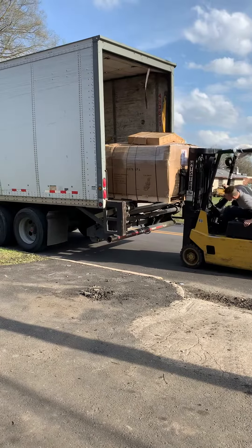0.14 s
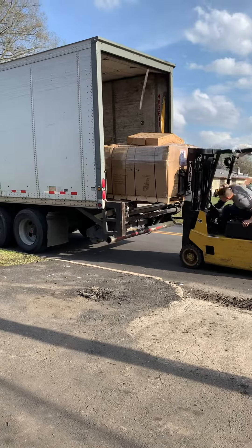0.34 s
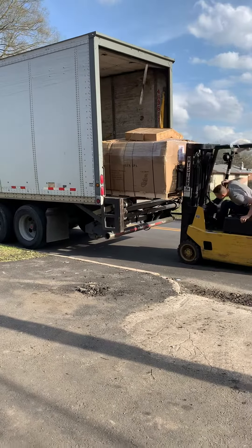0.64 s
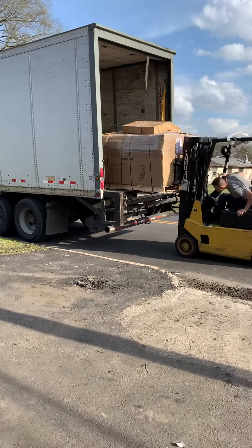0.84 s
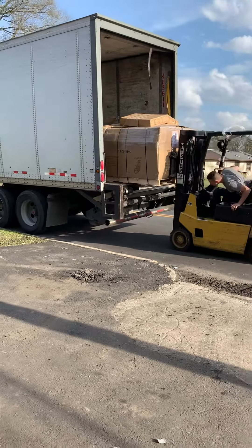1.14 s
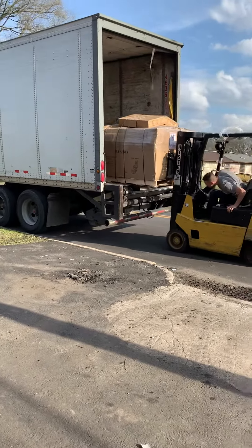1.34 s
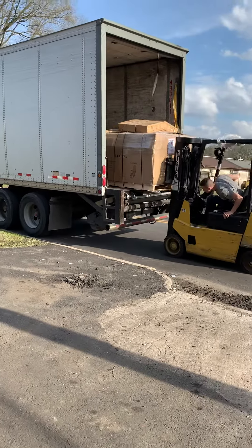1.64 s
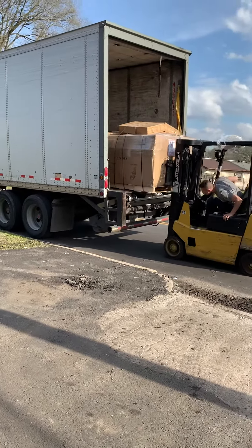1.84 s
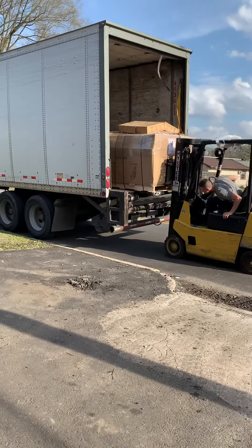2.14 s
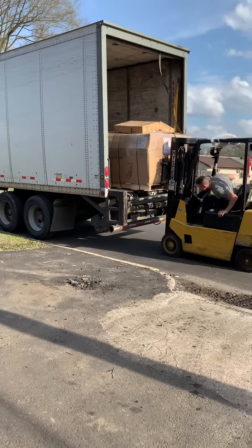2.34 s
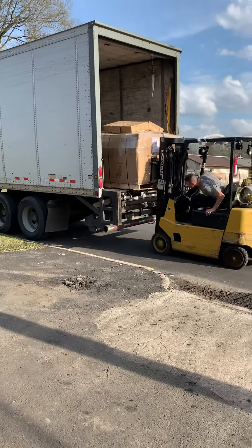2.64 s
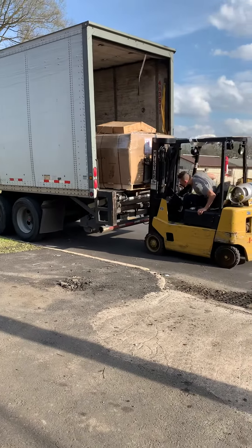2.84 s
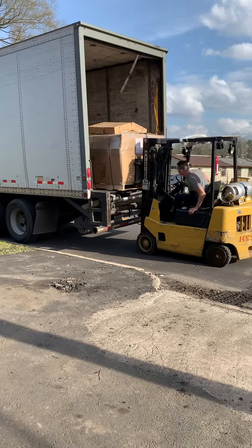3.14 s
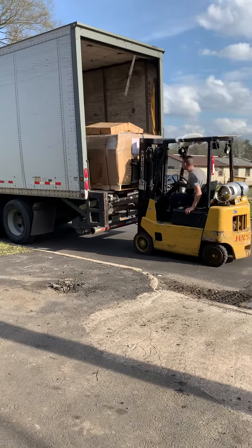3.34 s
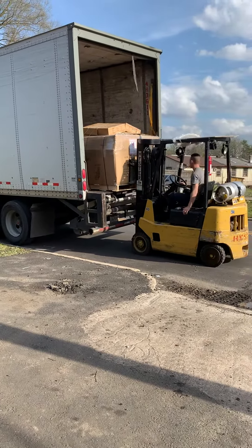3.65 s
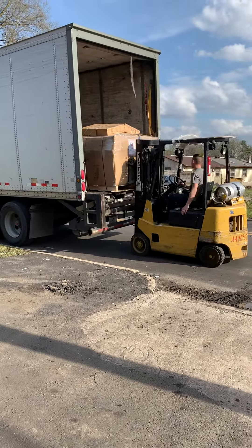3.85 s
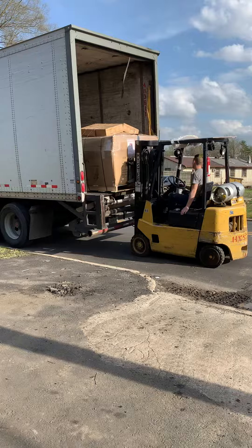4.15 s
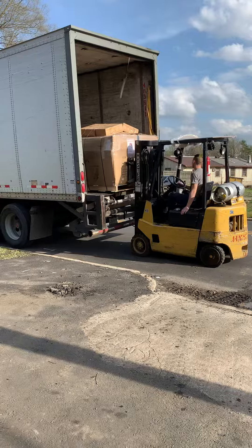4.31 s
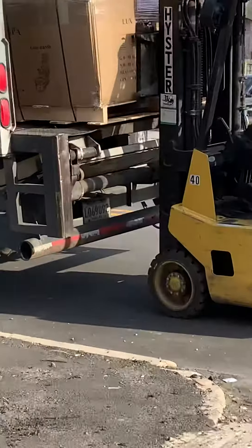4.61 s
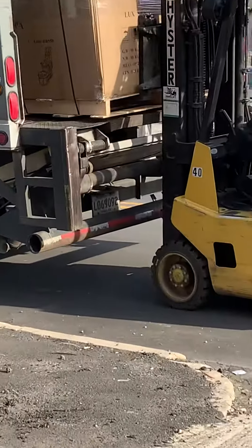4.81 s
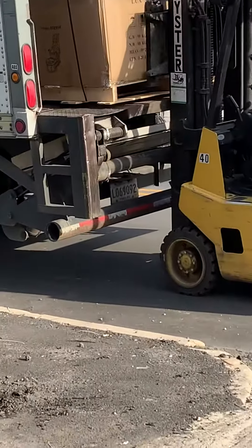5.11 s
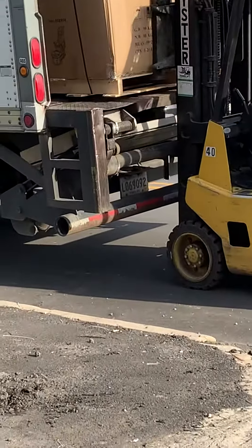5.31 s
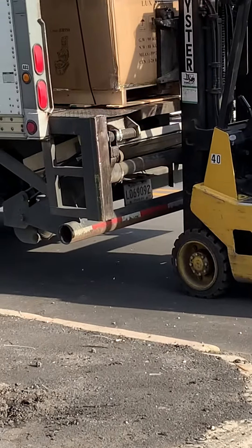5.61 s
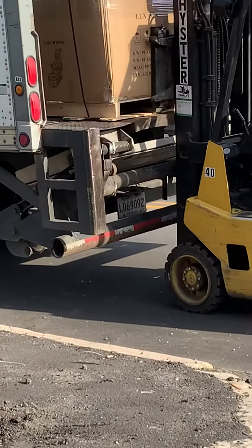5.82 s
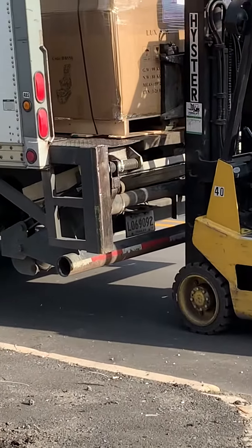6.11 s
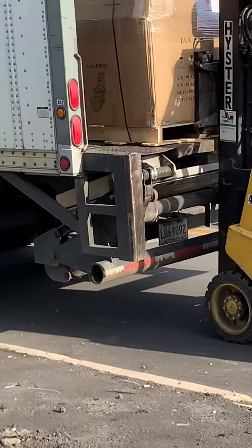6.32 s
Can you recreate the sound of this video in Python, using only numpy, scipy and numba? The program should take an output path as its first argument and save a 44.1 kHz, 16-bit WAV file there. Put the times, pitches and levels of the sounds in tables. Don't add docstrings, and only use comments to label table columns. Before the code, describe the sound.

Low uneven engine throb with hissing, rattling hood, wind buffeting the microphone, small metallic pings, then forks clanking sharply on a steel trailer.

```python
import sys
import numpy as np
from scipy import signal
from scipy.fft import rfft, irfft, next_fast_len
from scipy.io import wavfile
from scipy.ndimage import uniform_filter1d
from numba import njit

SR = 44100
rng = np.random.default_rng(int(sys.argv[2]) if len(sys.argv) > 2 else 0)


def attenuation_scalar(level_db):
    decades = np.asarray(level_db, float) / 20
    return 10 ** decades


def int16_out(signal):
    q = np.round(np.clip(np.atleast_2d(signal).T, -1, 1) * 32767)
    wavfile.write(sys.argv[1], SR, q.astype(np.int16))


N = 285323


def curve(rows):
    s, *columns = np.transpose(rows)
    return [np.interp(np.arange(N) / SR, s, c) for c in columns]


def unit(x):
    return x / np.sqrt(np.mean(x ** 2))


def on_log(points, hz):
    at, value = np.transpose(points)
    return np.interp(np.log(np.maximum(hz, 1)), np.log(at), value)


@njit
def svf(x, hz, width):
    y, band, low = np.empty(len(x)), 0., 0.
    g, k = np.tan(np.pi * hz / SR), width / hz
    for i in range(len(x)):
        v = (band + g * (x[i] - low)) / (1 + g * (g + k))
        band, low, y[i] = 2 * v - band, low + 2 * g * v, k * v
    return y


def walk(rate):
    k = int(SR / rate)
    held = np.repeat(rng.standard_normal(1000), k)[:N]
    return 1.125 * uniform_filter1d(uniform_filter1d(held, k), k)


def swells(base_db, s, length, db):
    t = np.arange(N) / SR
    power = attenuation_scalar(2 * base_db)
    power = power + sum(attenuation_scalar(2 * d) * np.exp(-(2 * (t - at) / w) ** 2) for at, w, d in zip(s, length, db))
    return 10 * np.log10(power)


def rush(points, flicker_db, rate):
    size = next_fast_len(N)
    hz, out, shared = np.fft.rfftfreq(size, 1 / SR), 0, walk(rate)
    inside = (hz > points[0][0]) * (hz < points[-1][0])
    shaped = rfft(rng.standard_normal(N), size) * attenuation_scalar(on_log(points, hz)) * inside
    third = 3 * np.log2(np.maximum(hz, 1))
    lowest, highest = 3 * np.log2(points[0][0]), 3 * np.log2(points[-1][0])
    for centre in np.arange(np.floor(lowest), highest + 2, 2):
        band = np.clip(1 - abs(third - centre) / 2, 0, 1)
        flicker = flicker_db * (shared + walk(rate)) / np.sqrt(2)
        out = out + irfft(shaped * band, size)[:N] * attenuation_scalar(flicker)
    return unit(out)


def burst(hz, width, t60, rise):
    t = np.arange(int(.25 * SR)) / SR
    noise = rng.standard_normal(len(t))
    for _ in range(3):
        noise = svf(noise, 1. * hz, 1. * width)
    y = noise * (1 - np.exp(-t / rise)) * np.exp(-np.log(1000) * t / t60)
    return y / abs(y).max()


def add(track, s, sound):
    i = int(s * SR)
    track[..., i:i + sound.shape[-1]] += sound[..., :N - i]


def engine():
    # start_s, firing_hz, exhaust_db
    running = [(0.0, 37.69, -31.5), (0.65, 35.0, -38.5), (1.08, 30.29, -34), (1.27, 29.98, -38.5),
               (1.38, 31.19, -39.5), (1.71, 33.31, -29), (2.0, 34.63, -28.5), (2.22, 32.6, -30.5),
               (2.65, 29.34, -33.5), (3.1, 32.8, -31), (3.41, 34.32, -33.5), (3.8, 35.52, -28.5),
               (4.4, 34.26, -34), (4.99, 31.61, -33.5), (5.06, 30.64, -36.5), (5.3, 32.83, -30),
               (5.77, 35.2, -31), (6.47, 37.24, -33.5)]
    # pitch_hz, width_hz, level_db
    pipe_tones = [(35, 16, -0.5), (69.5, 64, 2), (260, 80, -15.5), (341, 44, -20.5), (430, 26, -15.5),
                  (784, 200, -17.5)]
    # pitch_hz, over_exhaust_db
    yard_boom = [(104, 2.5), (118, 13.5), (141, 0.5), (162, 6), (178, -7.5), (216, -4.5), (250, -12.5),
                 (290, -16), (338, -22.5), (355, -13), (378, -20.5)]
    # start_s, gain_per_order_db
    exhaust_facing = [(0, 6.5), (.45, 7.5), (.8, 3), (1.1, 5), (1.5, 4), (2.0, -.5), (2.4, 4.5), (2.8, 3),
                      (3.3, 4), (3.9, 1), (4.4, 4), (5.0, -2.5), (5.6, 2.5), (5.9, -1), (6.2, 1.5),
                      (6.47, -1.5)]
    orders = (3, 4, 5, 10, 6, 7, 8)
    hz, db = curve(running)
    facing, = curve(exhaust_facing)

    t = np.arange(N) / SR
    turned = np.clip(np.minimum(t - 4, 6.1 - t) / 0.14, 0, 1)

    turns = np.cumsum(hz * (1 + 0.0021 * walk(12))) / SR
    fired = np.flatnonzero(np.diff(np.floor(turns)))
    firing_db = 3.1 * np.clip(rng.standard_normal(400)[:len(fired)], -2, 1)
    pulses = np.zeros(N)
    pulses[fired] = attenuation_scalar(firing_db)

    pipe = 0
    for k, (tone_hz, width_hz, tone_db) in enumerate(pipe_tones):
        ring = pulses
        for _ in range(2):
            ring = svf(ring, 1. * tone_hz, 1.74 * width_hz)
        shadow_db = -3 * turned * (k > 1)
        pipe = pipe + (-1) ** k * attenuation_scalar(tone_db + shadow_db) * unit(ring)

    boom = 0
    for order in orders:
        order_db = db + on_log(yard_boom, order * hz) + facing * (min(order, 6) - 4.6)
        if order >= 6:
            order_db = order_db - 27 * turned
        if order >= 7:
            order_db = order_db - 5.5
        level = attenuation_scalar(order_db + 2.97 * walk(14))
        boom = boom + level * np.cos(2 * np.pi * order * turns + 0.13 * order * walk(12))
    boom = boom * attenuation_scalar(1.25 * np.interp(np.arange(N), fired, firing_db))
    return unit(pipe) * attenuation_scalar(db) + boom, turns


def pump(turns):
    # start_s, length_s, level_db
    lifts = [(1.033, 0.031, -41), (1.242, 0.032, -44), (1.39, 0.045, -46), (1.443, 0.082, -40.5),
             (1.53, 0.049, -45), (1.594, .14, -40), (2.86, 0.12, -44.5), (2.983, 0.18, -37.5),
             (3.165, 0.26, -43), (3.5, 1.16, -51), (1.74, .17, -54), (5.055, 0.11, -44),
             (5.156, 0.18, -38.5), (5.36, 0.153, -38.5), (5.524, 0.24, -40), (5.897, 0.44, -45)]
    teeth, edge_s, idle_db = 25, 0.026, -59
    t = np.arange(N) / SR
    load = attenuation_scalar(idle_db)
    for s, length, db in lifts:
        load = load + attenuation_scalar(db) * np.clip(np.minimum(t - s, s + length - t) / edge_s + .5, 0, 1)
    level = load * attenuation_scalar(2.5 + 2.4 * walk(45))
    return level * np.sin(2 * np.pi * teeth * turns + 0.7 * walk(40) + 0.6 * walk(15))


def rattle(points, per_second, spread_db, count):
    out = 0
    pitches = np.geomspace(1.2 * points[0][0], .95 * points[-1][0], count)
    for hz in pitches * attenuation_scalar(0.26 * rng.standard_normal(count)):
        at, taps = rng.integers(0, N, int(per_second * N / SR)), np.full(N, 1e-18)
        size_db = spread_db * np.minimum(rng.exponential(size=len(at)), 3)
        taps[at] = attenuation_scalar(size_db) * rng.standard_normal(len(at))
        ring = svf(svf(taps, hz, hz / 8), hz, hz / 45)
        out = out + unit(ring) * attenuation_scalar(on_log(points, hz)) * np.sqrt(hz)
    return unit(out)


def hood(turns):
    # start_s, clatter_db
    steady = [(0.0, -40.5), (.4, -42.5), (.9, -43.5), (1.0, -44.5), (1.7, -43.5), (2.06, -42), (2.5, -45),
              (2.95, -46), (3.26, -41.5), (4.1, -40), (4.2, -44), (4.29, -41), (4.7, -41), (5.16, -43),
              (5.5, -39.5), (5.7, -41.5), (6.0, -38.5), (6.47, -41)]
    # centre_s, length_s, clatter_db, hiss_db
    jolts = [(0.52, 0.1, -40.5, -50), (0.646, 0.059, -38, -45), (1.368, 0.12, -45, -69),
             (1.804, 0.037, -38.5, -57), (1.884, 0.12, -47, -43), (2.16, 0.08, -42, -52),
             (2.33, 0.11, -44.5, -49.5), (2.74, 0.043, -63, -52), (2.878, 0.11, -45, -51),
             (4.651, 0.041, -39, -50), (5.272, 0.041, -26, -40.5), (5.624, 0.067, -46, -47),
             (6.242, .06, -54, -64)]
    # pitch_hz, density_db_per_hz
    hiss_colour = [(2200, -15), (3200, -3), (4500, -2.5), (6300, 0), (8500, -2.5), (10500, -1.5),
                   (13000, -12.5), (15500, -10)]
    # pitch_hz, density_db_per_hz
    clatter_colour = [(200, -31), (300, 2), (500, 4.5), (650, -2), (850, 2), (1120, -2), (1600, -2),
                      (1900, -8), (2600, -6.5), (3600, -18.5)]
    # pitch_hz, width_hz, over_hiss_db
    whistles = [(5170, 11.7, 6), (5430, 12, -6), (14995, 45, 8)]
    usual_db = -40.5
    steady_db, = curve(steady)
    s, length, jolt_clatter_db, jolt_hiss_db = np.transpose(jolts)
    clatter_db = swells(steady_db, s, length, jolt_clatter_db)
    steady_hiss_db = usual_db - 5.5 + 1.35 * (steady_db - usual_db)
    hiss_db = swells(steady_hiss_db, s, length, jolt_hiss_db)

    puff = np.exp(-(turns % 1) / 0.56)
    hiss = rush(hiss_colour, flicker_db=2.5, rate=12) * unit(1 + puff)
    hiss = hiss + attenuation_scalar(-2.5) * rattle(hiss_colour, per_second=50, spread_db=0.5, count=34)
    hiss = hiss + sum(attenuation_scalar(db) * svf(hiss, 1. * hz, 1. * width) for hz, width, db in whistles)
    clatter = rush(clatter_colour, flicker_db=1.5, rate=9) * unit(1 + 0.2 * puff)
    clatter = clatter + attenuation_scalar(-6.5) * rattle(clatter_colour[2:], per_second=35, spread_db=-0.7, count=24)
    return hiss * attenuation_scalar(hiss_db + 1.0) + clatter * attenuation_scalar(clatter_db + 2.5)


def clanks():
    # start_s, peak_db, brightest_hz, thud_db, edge_db
    knocks = [(5.242, -21, 1280, -11.5, -42), (5.2513, -15.5, 2800, -10, -34),
              (5.2754, -12.5, 2200, -11, -40), (5.299, -12.5, 3000, -14, -24.5),
              (5.305, -22, 1150, -5, -40), (5.331, -18.5, 1880, -16, -42), (5.3737, -22, 1750, -13.5, -54),
              (5.4084, -26, 1160, -29, -41), (5.4396, -26, 1360, -26, -54), (5.844, -20, 1000, -16, -34),
              (5.864, -19, 1600, -17, -31), (5.878, -19, 2200, -24, -27), (5.885, -23, 1090, -13, -37),
              (5.897, -24, 1300, -27, -37), (5.908, -22, 1110, -29, -44), (5.923, -21, 1100, -24, -47),
              (5.949, -26, 1150, -27, -41)]
    # pitch_hz, level_db, t60_s
    steel = [(464, 4, 0.12), (556, 4, 0.2), (608, 7, 0.29), (920, 5, 0.08), (1133, 9.5, 0.093),
             (1357, -1, 0.063), (1534, 7, 0.23), (1756, 0, 0.2), (2135, 4, 0.2), (2291, 0, 0.19),
             (2600, -5, 0.12), (2820, -1, 0.14), (3020, 1, 0.24), (3400, -18, 0.14)]
    out = np.zeros(N)
    for s, db, hz, thud_db, edge_db in knocks:
        shove = burst(hz, 1.9 * hz, 0.15, 0.00099)
        mix_db = 2. * rng.standard_normal(len(steel))
        ring = sum(attenuation_scalar(d + m) * svf(shove, 1. * f, 6.2 / t60) for (f, d, t60), m in zip(steel[3:], mix_db))
        thud = burst(454, 448.4, 0.12, 0.0056)
        boom = sum(attenuation_scalar(d) * svf(thud, 1. * f, 5.3 / t60) for f, d, t60 in steel[:3])
        bright = 0.36 * shove + 0.38 * ring / abs(ring).max()
        hollow = 0.26 * thud + 0.15 * boom / abs(boom).max()
        add(out, s, attenuation_scalar(db) * bright + attenuation_scalar(thud_db + 1.5) * hollow)
        add(out, s, attenuation_scalar(edge_db + 6) * burst(10800, 21000, 0.069, 0.0024))
    return out


def strikes():
    # start_s, peak_db, pitch_hz, decay_s
    contacts = [(1.346, -26, 610, 0.0051), (2.612, -43, 4950, .014), (0.519, -22, 680, 0.0067),
                (2.7705, -37, 2200, .004), (2.7705, -32, 3400, .003), (2.7705, -38, 4760, .004),
                (2.7705, -32, 6380, 0.0026), (2.77, -23, 8400, .003), (5.252, -25, 3250, .005),
                (5.252, -30, 2800, .006), (5.254, -24, 1200, 0.0079), (5.256, -24, 894, .01),
                (5.258, -16.5, 583, 0.012), (5.275, -18, 1580, 0.0053), (5.276, -17, 2100, 0.0056),
                (5.2755, -22, 3080, .005), (5.282, -19, 1357, 0.0072), (5.278, -36, 4400, .004),
                (5.298, -21, 2850, .007), (5.3, -25, 3062, .01), (5.303, -23, 1730, 0.0044),
                (5.301, -30, 4680, 0.0026), (5.304, -35, 5800, 0.0036), (5.864, -27, 1510, 0.039),
                (5.872, -25, 1030, 0.016), (5.886, -28, 1204, .012), (5.89, -34, 2530, .008),
                (5.91, -25, 1130, 0.015)]
    rise_s = 0.0009
    out, t = np.zeros(N), np.arange(int(.1 * SR)) / SR
    for s, db, hz, decay_s in contacts:
        shape = (1 - np.exp(-t / rise_s)) * np.exp(-t / decay_s)
        add(out, s, attenuation_scalar(db) * shape / shape.max() * np.sin(2 * np.pi * hz * t))
    return out


def ticks():
    # start_s, peak_db, centre_hz,
    # left_minus_right_db
    grit = [(0.734, -33, 11500, -1), (1.8412, -32, 9000, -1), (2.2852, -27.5, 9050, 4),
            (5.04, -34, 8900, -6), (1.1647, -38, 1880, 7), (1.7695, -29.5, 2820, -3), (1.919, -30, 2530, 0),
            (2.254, -51, 2247, -7), (2.495, -30.5, 1850, -5), (2.5678, -33, 1833, 0.0),
            (2.588, -30, 2100, 2), (2.6933, -35, 2200, -0.5), (2.7304, -31.5, 1848, -13),
            (2.7706, -31, 6193, 4), (2.771, -32, 2500, -8), (3.1189, -33, 1830, 4), (5.2995, -28, 5200, -2),
            (5.309, -32, 5000, 0), (5.2535, -34, 4300, 0), (5.4076, -26, 2660, -4),
            (5.449, -22.5, 3112, -2), (1.1953, -36, 5000, 0), (1.346, -34, 2100, 1), (1.36, -27.5, 2300, 1),
            (1.3845, -32, 9800, -1), (2.0873, -32, 9500, 0), (2.5367, -36, 9500, 0), (2.9628, -43, 2500, 4),
            (3.8607, -31, 10500, -1), (3.9166, -41, 10470, -1), (4.6222, -27, 10490, -1),
            (4.7861, -34, 2500, 3), (4.824, -35, 9800, -3), (5.076, -39, 9800, -1), (5.8218, -34, 2195, 2),
            (6.1805, -42, 10220, -4)]
    # start_s, peak_db, pitch_hz, left_minus_right_db
    pings = [(0.1481, -35, 6170, -2.0), (1.3843, -36, 6000, -1.5), (1.404, -30.5, 2210, 3),
             (2.1715, -25, 4700, 1.5), (2.7703, -27, 3631, -3), (2.8804, -34.5, 10000, -2.0),
             (3.2894, -34, 5870, -2.0), (3.4062, -43, 6280, -2.0), (3.9434, -36, 6470, -2.5),
             (4.3136, -33.5, 6330, -2.0), (4.5118, -30, 6500, -2.0), (4.6219, -37, 6100, -3),
             (5.4725, -32, 10290, -1.0), (5.7902, -31, 6200, -1), (6.135, -44, 6810, -2.0)]
    # start_s, peak_db, pitch_hz, left_minus_right_db
    squeaks = [(2.883, -41, 5000, 0), (4.8444, -40, 4626, -10), (5.8815, -37, 3810, 2),
               (5.958, -38, 3760, 1), (5.895, -36, 7900, -1)]
    out = np.zeros((2, N))
    for rows, width, t60 in ((grit, 1.6, .02), (pings, .35, .03), (squeaks, .04, .07)):
        for s, db, hz, pan_db in rows:
            lean = np.array([[1], [np.tanh(pan_db / 6)]])
            add(out, s, attenuation_scalar(db + 1.5) * lean * burst(hz, width * hz, t60, rise=0.00064))
    return out


def slap(hz, t60, phase):
    t = np.arange(int(.25 * SR)) / SR
    wobble = np.sin(2 * np.pi * hz * (1.185 * t - 29.0 * t ** 2) + phase)
    kick = wobble * (1 - np.exp(-t / 0.00046)) * np.exp(-t / 0.0065)
    return kick / abs(kick).max() + 0.41 * burst(hz, 0.59 * hz, t60, 0.008)


def wind(scatter_rad):
    # start_s, rumble_db
    breeze = [(0, -32), (.66, -24), (.88, -34), (1.3, -21), (1.66, -30), (2.5, -29), (3.0, -22.5),
              (3.7, -24.5), (3.95, -25), (4.3, -22.5), (4.65, -24.5), (4.9, -23), (5.25, -25.5), (5.6, -35),
              (5.9, -25), (6.14, -24.5), (6.47, -27)]
    # centre_s, length_s, rumble_db, flutter_db
    gusts = [(0.182, 0.16, -21.5, -29.5), (0.359, 0.068, -16, -17), (0.448, 0.057, -15.5, -18),
             (0.553, 0.098, -14.5, -18.5), (0.954, 0.06, -12, -38), (1.072, 0.051, -23, -22),
             (1.188, 0.21, -15, -27.5), (1.346, 0.042, -10.5, -23), (1.43, 0.13, -22.5, -45),
             (1.584, 0.057, -19, -24), (1.78, 0.091, -20.5, -25), (1.9, 0.025, -13, -18.5),
             (1.991, 0.11, -23, -29), (2.214, 0.068, -9.5, -14), (2.324, 0.12, -15, -20.5),
             (2.577, 0.28, -17.5, -23.5), (2.705, 0.22, -25, -31), (2.823, 0.061, -13.5, -21.5),
             (2.886, 0.1, -27, -28), (3.818, 0.1, -29, -26.5), (4.013, 0.057, -16.5, -35),
             (4.119, 0.056, -16, -22.5), (4.524, 0.069, -16.5, -53), (4.78, 0.057, -22, -45),
             (5.325, 0.15, -18, -17), (5.483, 0.18, -20, -23.5), (5.726, 0.084, -19, -16),
             (5.778, 0.064, -13, -20), (5.9, 0.1, -19, -17), (6.018, 0.075, -16, -17.5),
             (0.763, 0.089, -24.5, -42), (6.399, 0.13, -36, -20), (5.953, 0.056, -30, -35),
             (1.024, 0.042, -23, -39)]
    # pitch_hz, density_db_per_hz
    rumble_colour = [(12, -44), (20, -37), (42, -3), (59, 3), (92, 1.5), (123, 0), (156, -0.5), (190, -6.5),
                     (250, -19.5), (420, -120)]
    # start_s, peak_db, centre_hz
    eddies = [(0.334, -16, 378), (0.43, -30, 370), (0.464, -15.5, 290), (0.058, -21, 380),
              (0.377, -16.5, 302), (0.519, -22, 553), (0.537, -8, 508), (0.546, -11, 295),
              (0.586, -15, 294), (0.921, -22.5, 278), (1.164, -20, 275), (1.262, -27, 320),
              (1.317, -26, 470), (1.3453, -15, 343), (1.852, -18, 280), (1.894, -25.5, 455),
              (1.97, -19, 295.6), (2.042, -18, 427), (2.067, -23, 350), (2.157, -31, 520),
              (2.1759, -9.5, 392), (2.188, -18.5, 490), (2.197, -23, 400), (2.209, -9.5, 326.6),
              (2.2337, -12.5, 435), (2.266, -33, 280), (2.305, -17, 328), (2.33, -21, 380),
              (2.394, -18, 400), (2.536, -16, 305), (2.812, -9.5, 472), (2.832, -13, 333),
              (2.886, -28, 300), (2.94, -27, 296), (3.294, -22, 259.9), (3.423, -20, 296.4),
              (3.95, -21.5, 285), (4.091, -24.5, 431), (5.699, -18, 344), (5.708, -27, 393.4),
              (5.7275, -13, 361.7), (5.744, -14, 403), (5.875, -17, 377), (5.909, -12, 348),
              (6.456, -16.5, 415)]
    flutter_colour = [(185, -1), (250, 5.5), (320, 3), (450, -8.0), (850, -8.5)]  # Hz, dB per Hz
    breeze_db, = curve(breeze)
    s, length, gust_rumble_db, gust_flutter_db = np.transpose(gusts)
    rumble_db = swells(breeze_db, s, length, gust_rumble_db)
    flutter_db = swells(breeze_db - 7.5, s, length, gust_flutter_db) - rumble_db
    flutter = rush(flutter_colour, flicker_db=4.5, rate=32)
    rumble = rush(rumble_colour, flicker_db=2.5, rate=17)
    out = attenuation_scalar(rumble_db - 5.0) * (rumble + attenuation_scalar(flutter_db - 9.0) * flutter)
    for s, db, hz in eddies:
        phase = 2.76 + scatter_rad * rng.random()
        add(out, s, attenuation_scalar(db - 5.0) * slap(1.04 * hz, t60=0.048, phase=phase))
    return out


def scatter(x, seconds=0.052):
    t = np.arange(int(.1 * SR)) / SR
    echo = rng.standard_normal(len(t)) * np.exp(-np.log(1000) * t / seconds)
    return signal.fftconvolve(x, echo / np.sqrt(np.sum(echo ** 2)))[:N]


def ports(one, other):
    # pitch_hz, left_lead_rad
    port_phase = [(0, 0), (2400, 0), (5100, 2.4), (5900, 0), (7200, -1.2), (7900, -2.9), (9000, -3.4),
                  (10700, -6.2), (11500, -6.4), (12800, -9.2), (14200, -9.6), (15400, -12.5), (22050, -20)]
    # pitch_hz, left_minus_right_db
    shade = [(2400, 0), (3200, -0.5), (5200, -3.5), (6500, -2), (7300, 1)]
    # pitch_hz, shared_fraction
    likeness = [(60, 0.58), (220, 0.65), (700, 0.5), (2400, 0.63), (4500, 0.021), (6000, 0.43),
                (7800, 0.92), (8800, 0.97), (10500, 0.36), (13400, 0.95)]
    hz = np.fft.rfftfreq(N, 1 / SR)
    turn = np.exp(.5j * np.interp(hz, *np.transpose(port_phase))) * attenuation_scalar(on_log(shade, hz) / 2)
    like = np.clip(on_log(likeness, hz), 0, 1)
    both = rfft(one) * np.sqrt((1 + like) / 2)
    apart = rfft(other) * np.sqrt((1 - like) / 2)
    return np.array([irfft((both + apart) * turn, N), irfft((both - apart) / turn, N)])


def scene():
    throb, turns = engine()
    metal_and_motor = throb + pump(turns) + clanks() + strikes()
    click, lean = ticks()
    near, echo, far = hood(turns), scatter(metal_and_motor), hood(turns)
    lean_db = np.interp(np.arange(N) / SR, [4.2, 4.9], [0, -.8]) / 2
    breeze = wind(scatter_rad=0.97) + attenuation_scalar(-2.5) * wind(scatter_rad=2 * np.pi) * np.array([[1], [-1]])
    shake = attenuation_scalar(1.28 * walk(11))
    machine = ports(metal_and_motor + click + near * shake, echo + lean + far * shake)
    return (machine + breeze) * attenuation_scalar(np.array([lean_db, -lean_db]))


def low_pass(x):
    return signal.sosfilt(signal.butter(12, 15840, fs=SR, output="sos"), x)


def record(dry):
    # start_s, mono_below_hz, depth_db
    guard = [(0, 30.8, 0), (0.821, 30.16, 0), (.86, 128, -90), (.98, 378, -90), (1.3, 484, -64),
             (3.1, 496, -84), (3.45, 327, -84.5), (4.0, 230, -72), (4.1, 166.9, -73), (4.7, 90.5, -33),
             (5.0, 50.17, -18), (6.47, 29.7, -4)]
    mid, side = (dry[0] + dry[1]) / 2, (dry[0] - dry[1]) / 2
    hz, t, frames = signal.stft(side, SR, nperseg=2048)
    s, edge_hz, depth_db = np.transpose(guard)
    below = 1 / (1 + (hz[:, None] / np.interp(t, s, edge_hz)) ** 14)
    guarded = frames * attenuation_scalar(below * np.interp(t, s, depth_db))
    side = signal.istft(guarded, SR, nperseg=2048)[1][:N]
    return low_pass(np.array([mid + side, mid - side]))


dry = scene()
out = record(dry)
int16_out(out)
```